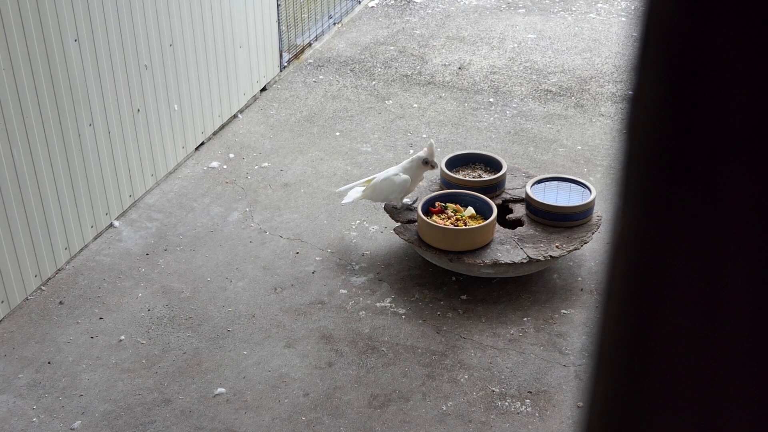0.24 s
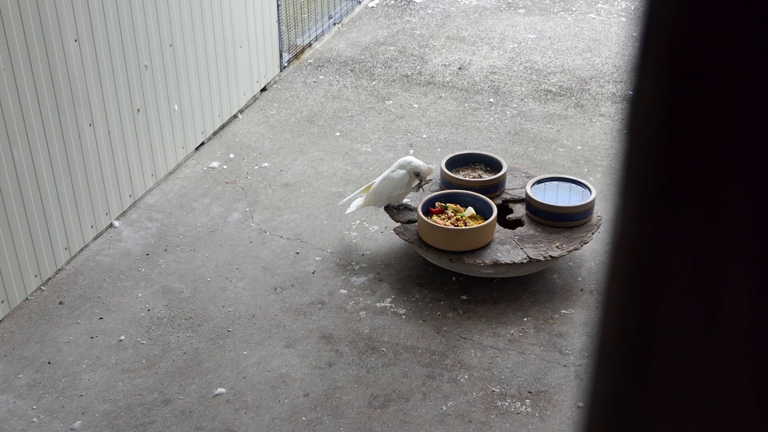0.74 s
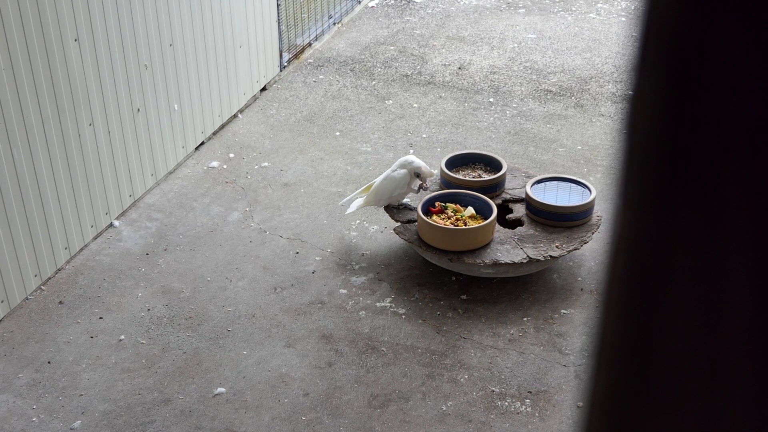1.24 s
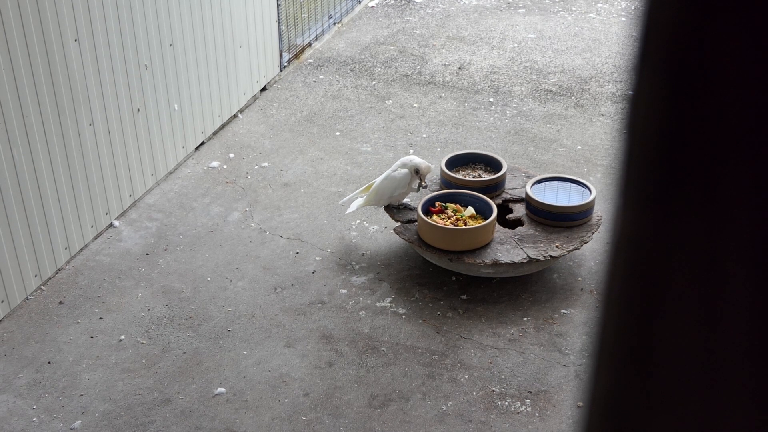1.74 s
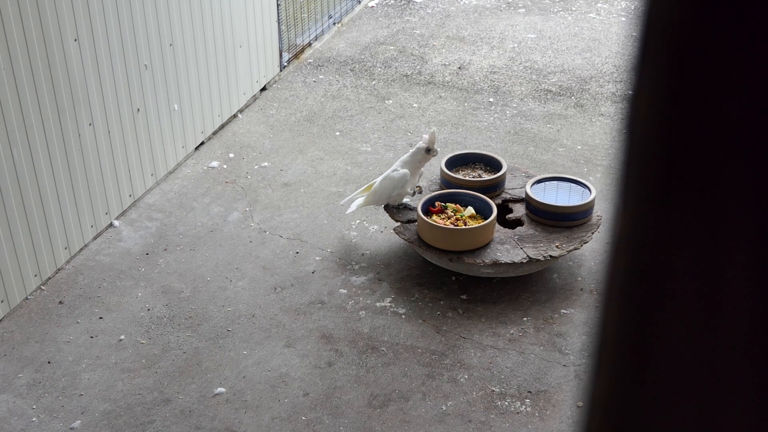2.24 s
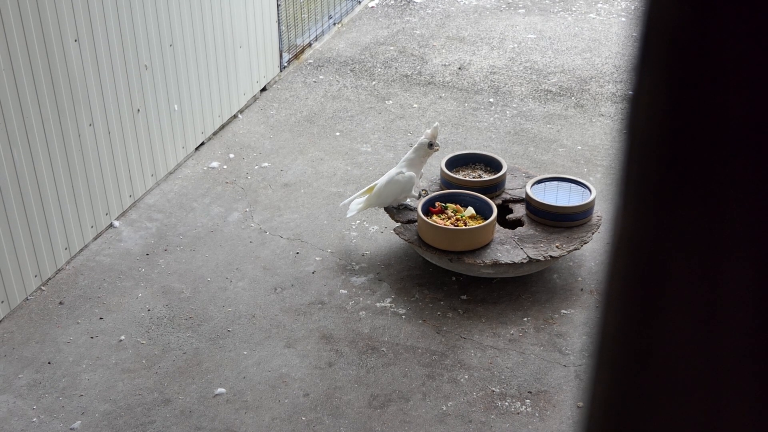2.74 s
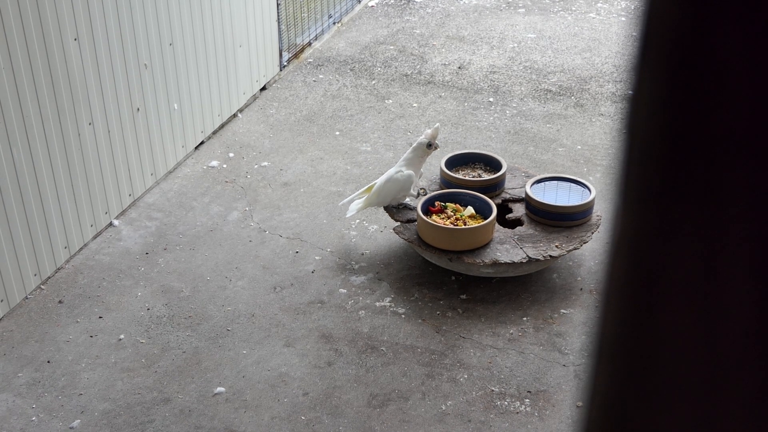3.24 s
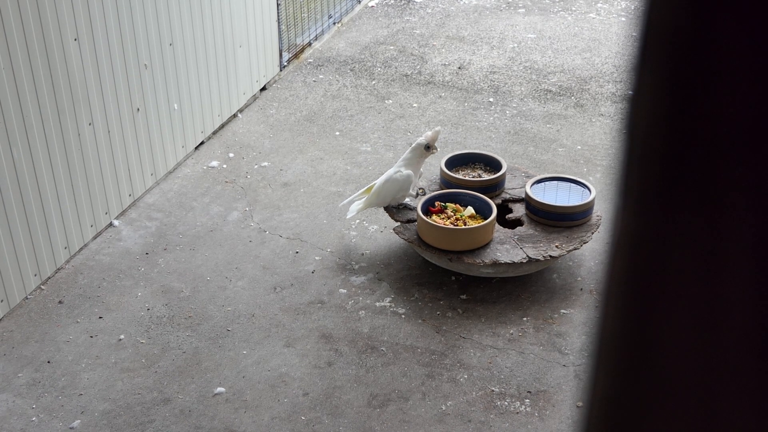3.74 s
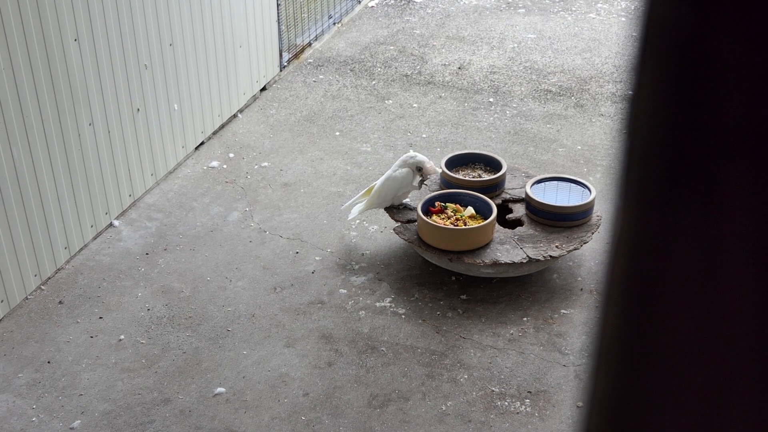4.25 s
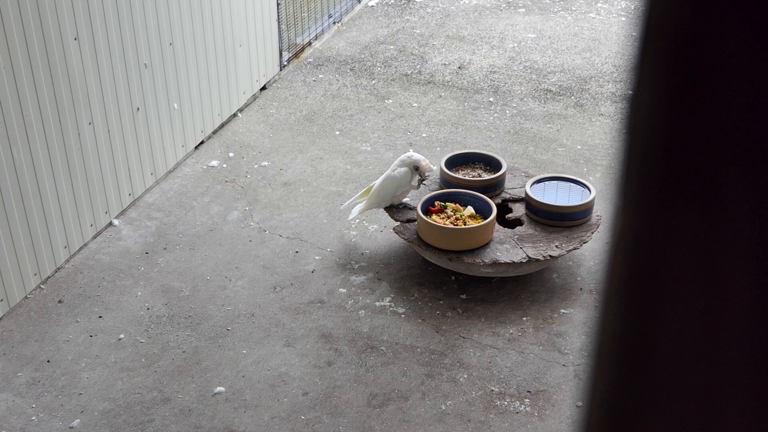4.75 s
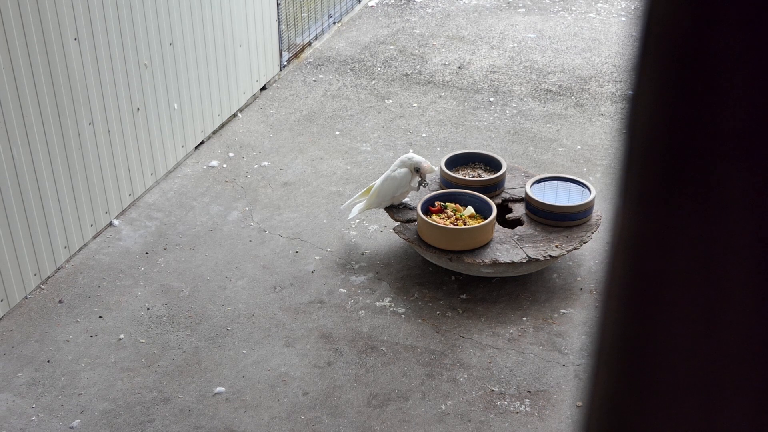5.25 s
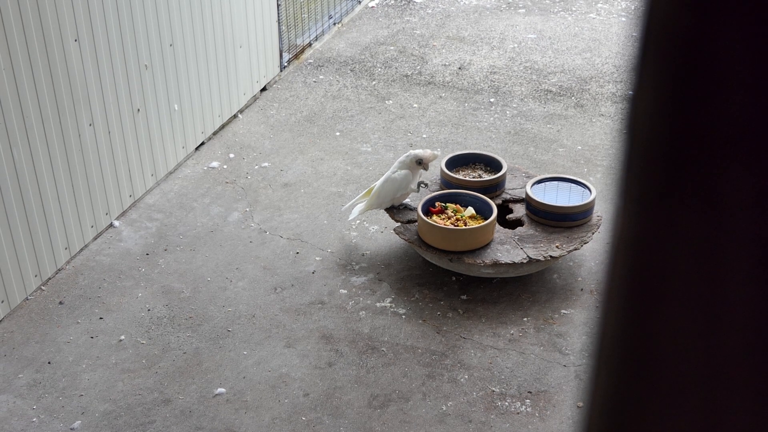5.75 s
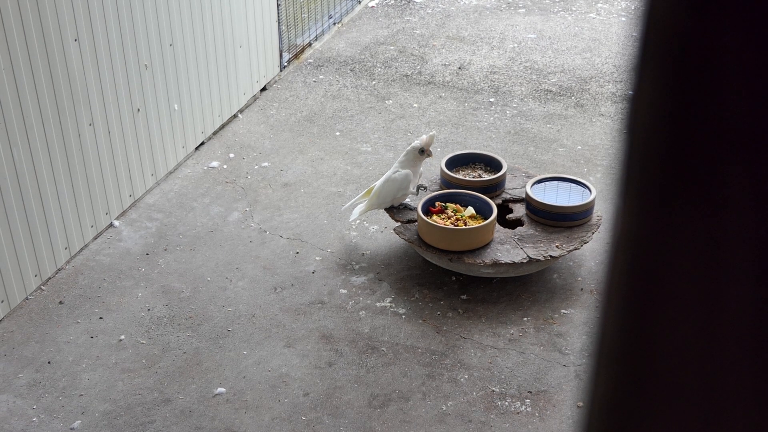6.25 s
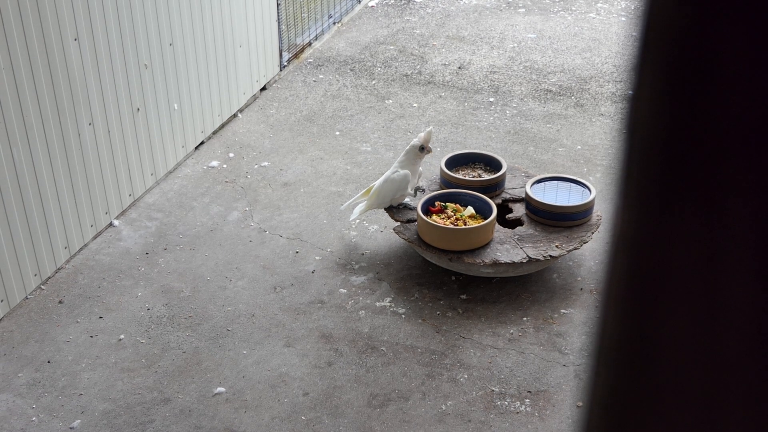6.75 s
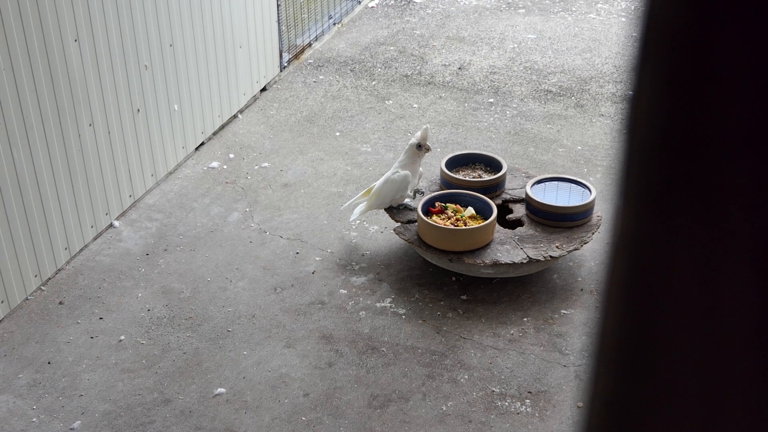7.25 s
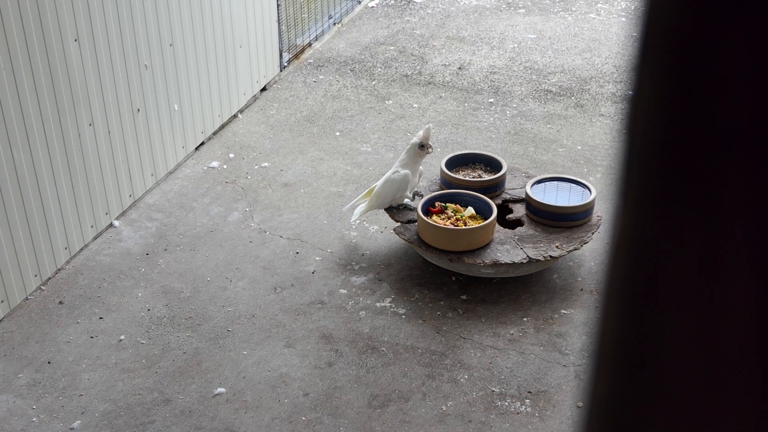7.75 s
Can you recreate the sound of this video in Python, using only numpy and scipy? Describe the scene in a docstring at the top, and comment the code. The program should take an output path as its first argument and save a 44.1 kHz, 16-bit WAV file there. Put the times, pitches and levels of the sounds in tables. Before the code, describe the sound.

A cockatoo screeches loudly and harshly up close, another answers farther off, and small birds chirp softly in an outdoor aviary.

```python
"""Parrots in an aviary

Two large parrots screech in turn, one near the microphone, one farther off, their vocal membranes
rasping in and out of order. Small birds chirp and trill between; beaks and feet tick and clank on wire
and tin. Concrete and sheet-metal walls answer each sound, over a low rumble and a thin outdoor hiss.
The loudest cries clip the microphone's input."""
import sys
import numpy as np
from scipy import signal
from scipy.fft import rfft, irfft, next_fast_len
from scipy.io import wavfile
from scipy.ndimage import map_coordinates

SR = 44100
rng = np.random.default_rng(int(sys.argv[2]) if len(sys.argv) > 2 else 0)


def wrap_up_sound(samples):
    """Save the sound to the file named by the first command line argument, as 16-bit audio."""
    columns = np.atleast_2d(samples).T
    # keep every value between -1 and 1, then stretch to whole-number steps
    tamed = np.clip(columns, -1, 1)
    steps = np.round(tamed * 32767).astype(np.int16)
    wavfile.write(sys.argv[1], SR, steps)


N = 352359

# The microphone's close-set ports. Each row: frequency in Hz, left-right likeness from 0 to 1.
PORT_LIKENESS = [(60, .7), (130, 0.9), (300, 0.94), (640, 0.81), (1400, 0.61), (3100, 0.47), (6800, 1),
                 (15000, 0.33)]
# Its stereo widening. Each row: frequency in Hz, lift of side over mid in dB.
SIDE_LIFT = [(40, 3.5), (200, 7), (500, 8), (1200, 0), (2500, -2.5)]
# The hard walls. Each row: frequency in Hz, seconds to die by 60 dB (t60).
WALL_DECAY = [(300, 0.6), (1300, 0.47), (3500, 0.49), (9000, 0.38), (15000, .3)]

# Background rumble and hiss as heard; the rumble ducks just after the loudest cry.
# Each row: time in seconds, rumble in dB, hiss in dB.
BACKGROUND_LEVELS = [(0, -58.5, -64), (.6, -61, -70), (1.2, -59.5, -57), (1.7, -61, -61.5),
                     (3.5, -56.5, -62.5), (3.65, -67.5, -57), (3.9, -63, -57.5), (4.8, -62, -62.5),
                     (5.65, -64, -61), (5.8, -57, -60), (6, -62, -61.5), (6.3, -55, -53.5),
                     (6.9, -57.5, -59), (7.499, -54.5, -54.5)]
# The colour of each. Each row: frequency in Hz, relative density in dB.
RUMBLE_SPECTRUM = [(15, -43), (30, -24), (75, -9), (123, -15), (198, -2.5), (300, -6), (400, -10),
                   (540, -12), (650, -35.5), (900, -47)]
HISS_SPECTRUM = [(300, -24.5), (600, 0.5), (1200, 1), (1900, -1), (2400, -3), (4000, -3.5), (5300, -16.5),
                 (7000, -21.5), (10000, -5.5), (12000, -16.5), (15500, -36.5)]
# Narrow bands in the hiss. Each row: centre in Hz, width in Hz, relative density in dB.
HISS_BANDS = [(542, 31, 11), (1960, 340, -1), (5460, 470, -2)]
# A low hum. Each row: time in seconds, level in dB.
HUM_LEVELS = [(0, -77.5), (.8, -83), (1.1, -65), (1.6, -64.5), (1.8, -88), (7.99, -95)]

# Sharp ticks, slower scuffs, a thud. Each row: start in seconds, level in dB, centre in Hz,
# t60 in seconds.
TICKS = [(.436, -45, 6750, .091), (.975, -46, 7200, .11), (1.19, -46.5, 10150, .024),
         (6.025, -46.5, 10250, .092), (6.735, -46, 7900, .033), (7.214, -45, 9880, .1),
         (7.485, -52.5, 7010, .04), (7.63, -49, 7950, .045)]
SCUFFS = [(6.11, -41.5, 11310, 0.16), (6.37, -49, 8180, .2), (7.04, -47.5, 10000, .26)]
THUDS = [(.207, -47.5, 234, 0.19)]
# Their shapes. Each: width in octaves, rise in seconds.
TICK_SHAPE, SCUFF_SHAPE, THUD_SHAPE = (1.3, .0023), (.6, .021), (.56, .0055)
# Blows that leave a wire singing. Each row: start in seconds, level in dB.
WIRE_BLOWS = [(1.284, -49), (6.023, -40.5)]
# The wire's strike, then its ring. Each row: delay in seconds, relative level in dB, centre in Hz,
# t60 in seconds, width in octaves, rise in seconds.
WIRE_PARTS = [(0, 1, 9870, .12, 0.2, 0.0016), (.015, -6, 9900, 0.9, .08, 0.011)]
# Blows on a tin sheet. Each row: start in seconds, ring in dB, rattle in dB.
TIN_BLOWS = [(0.438, -67, -51), (.976, -63.5, -51.5), (7.291, -65, -52.5)]
# The sheet's modes. Each row: frequency in Hz, relative level in dB, t60 in seconds.
TIN_MODES = [(292.3, -5, 0.97), (517, 7.5, 1), (798, 4.5, 0.31), (898, -2, 0.51), (1180, -7, 0.98),
             (2080, -1, .2), (2400, 4, .2), (3200, 6, 0.16)]
# Its rattle. Each row: frequency in Hz, relative density in dB.
RATTLE_SPECTRUM = [(150, -44), (250, -7), (518, -11.5), (1260, -16.5), (2340, -14), (4190, -22),
                   (7260, -28.5), (12000, -27), (15600, -54), (22000, -120)]

# Clean peeps and fluttering down-slurs. Each row: start in seconds, relative level in dB,
# length in seconds, first and last pitch in Hz.
PEEPS = [(0.206, -39, .026, 5490, 4883), (1.38, -73.5, .054, 4170, 4020), (1.5, -64.5, 0.058, 4200, 3913),
         (1.661, -55.5, 0.069, 3796, 4180), (4.364, -37, .02, 2500, 2750), (5.869, -48, .035, 2960, 3450),
         (5.901, -47.5, 0.047, 4163, 3800), (6.317, -53, .07, 4084, 3855), (6.74, -43.5, 0.028, 6490, 5930),
         (7.223, -37.5, .06, 5960, 5830), (7.633, -44.5, .048, 6260, 5630)]
SLURS = [(0.251, -44, 0.071, 4746, 2778), (.49, -49, 0.076, 4585, 2800), (5.969, -53.5, 0.03, 3560, 2875),
         (6.835, -46.5, .085, 4330, 3150), (7.09, -49.5, 0.1, 3595, 3370), (7.49, -43.5, 0.063, 4520, 3120)]
# Nasal cheeps. Each row: as for the peeps, then the fundamental in dB against the second partial.
CHEEPS = [(.002, -47.5, .075, 2900, 2870, -4.5), (1.769, -37, .045, 2850, 2717, 0),
          (4.144, -38.5, 0.042, 2606, 3070, -11), (4.251, -32.5, 0.057, 2530, 3066, -18.5),
          (4.37, -31, .055, 3000, 2318, -18), (5.188, -30, 0.015, 3165, 2283, -11)]
# Rising chips. Each row: start in seconds, relative level in dB, top pitch in Hz, fundamental in dB.
CHIPS = [(4.486, -37.5, 3017, -5.5), (4.51, -34, 3848, 1), (4.598, -35.5, 3305, -7), (4.62, -29.5, 3900, 1),
         (4.722, -30.5, 3523, -6.5), (4.844, -31, 3400, -6.5), (4.962, -30.5, 3030, -11.5),
         (5.085, -29, 3306, -7)]
# A trill of dipping notes. Each row: start in seconds, relative level in dB, pitch in Hz.
TRILL = [(5.277, -28.5, 5040), (5.399, -29, 5056), (5.508, -28.5, 5227), (5.614, -29.5, 5206),
         (5.73, -30, 5442)]
CHIP_S, CHIP_START_HZ, TRILL_S = .011, 2630, .039
PEEP_FUNDAMENTAL_DB, SLUR_FUNDAMENTAL_DB, TRILL_FUNDAMENTAL_DB = 13.5, 12.5, 5.5
# Small voices. Each: mid-glide bow as a share of pitch, step per overtone in dB, flutter from 0 to 1.
PEEP_VOICE, SLUR_VOICE, CHEEP_VOICE = (.0086, -19, .3), (.046, -13, 1), (.015, -13, .38)
CHIP_VOICE, TRILL_VOICE = (.01, -6, .11), (-.14, -16, .69)
# Breath in a chirp. Each row: frequency in Hz, relative density in dB.
CHIRP_BREATH = [(1500, -48), (2500, -7), (11000, 2.5), (15000, -13.5)]

# Parrot throats: the far bird, the near bird hoarse and clear. Each row: frequency in Hz, gain in dB.
FAR_THROAT = [(240, -78.5), (400, -68), (847, -27), (1380, -7.5), (1880, -4), (2030, -4), (2360, -1),
              (3210, -13.5), (3920, -3), (4560, -8.5), (5320, -9), (5920, -20.5), (8040, -32), (9230, -19),
              (15500, -44.5)]
HOARSE_THROAT = [(300, -41.5), (600, -27.5), (987, -11), (1200, -15), (1400, -10), (1910, -14.5),
                 (2250, -7), (2480, -4.5), (2720, -10), (3050, -8.5), (3650, -6.5), (4230, -12),
                 (4700, -10), (5570, -14), (6900, -19.5), (9820, -24.5), (15500, -47)]
CLEAR_THROAT = [(320, -60.5), (600, -18.5), (900, -16.5), (1230, -1), (1800, -11), (2400, 3), (3000, -16),
                (3550, -4), (4200, -16.5), (4800, -6), (5900, -10), (7500, -21), (10000, -21),
                (15500, -48.5)]
# The far cries. Each row: start, attack and length before release in seconds, relative level in dB.
FAR_CRIES = [(1.87, 0.082, 0.4, -9), (3.498, .06, 0.26, -13.5)]
# The three near cries, a list apiece. Each row: time in seconds, relative level in dB, pitch in Hz,
# chaos from 0 to 1, lift under 1.5 kHz in dB.
NEAR_CRIES = [
    [(2.29, -19.5, 600, .95, 3.5), (2.37, -6.5, 599.5, 0.74, -0.5), (2.518, -7, 627, .68, -1),
     (2.575, -13.5, 638, 0.46, 4.5), (2.635, -12, 622.6, 0.09, 9.5), (2.68, -15, 594.4, .2, -2.5),
     (2.718, -11, 599.4, 0.1, 0.5), (2.755, -13.5, 585.7, .08, 3.5), (2.8, -25.5, 520, 0.47, 14.5),
     (2.82, -29, 512, .4, 8)],
    [(2.99, -35, 613.3, 0.52, 4), (3.005, -20, 618.2, 0.58, 2), (3.057, -6.5, 622.3, 0.58, -3),
     (3.2, -4.5, 620.7, .66, -7.5), (3.345, -2, 621.8, 0.63, -7), (3.384, -5, 628.5, 0.26, -3),
     (3.481, -8, 611.4, .35, 1.5), (3.53, -9, 596, 0.38, -1), (3.563, -13, 567.5, .2, 3),
     (3.598, -25, 578, 0.4, 1.5)],
    [(7.734, -40.5, 601, 0.42, 7.5), (7.77, -19, 605.2, 0.53, 4), (7.82, -8, 619.8, 0.63, 3),
     (7.861, -5.5, 617.4, 0.67, 0.5), (7.99, -6, 614.5, 0.66, 0)],
]
# The beak's resonance. Each entry: its lift in one near cry, in dB.
BEAK_LIFTS = [0, 6.5, -6]
BEAK_HZ, BEAK_WIDTH_HZ = 2500, 700
ODD_CLEAR_DB, ODD_HOARSE_DB = 2, -11.5  # odd partials against the even ones


def amp(db):
    """Gain of a level in dB."""
    return 10 ** (np.asarray(db) / 20)


def unit(x):
    """x at rms 1."""
    return x / np.sqrt(np.mean(x ** 2) + 1e-20)


def along(points, hz):
    """Reads (Hz, value) points on a log axis."""
    freqs, values = np.transpose(points)
    return np.interp(np.log(hz + 1), np.log(freqs + 1), values)


def wobble(n, rate):
    """A smooth random curve of n samples, rate knots a second."""
    return map_coordinates(rng.standard_normal(int(n * rate / SR) + 4), [np.arange(n) * rate / SR])


def filtered(x, response):
    """x through a gain that depends on frequency."""
    size = next_fast_len(x.shape[-1] + 4096)
    return irfft(rfft(x, size) * response(np.fft.rfftfreq(size, 1 / SR)), size)[..., :x.shape[-1]]


def coloured(x, spectrum):
    """x through a curve of (Hz, dB) points, at rms 1."""
    return unit(filtered(x, lambda hz: amp(along(spectrum, hz))))


def spread(pair):
    """Two unrelated signals mixed to the likeness of the two microphone ports."""
    turn = lambda hz: np.arccos(np.clip(along(PORT_LIKENESS, hz), -1, 1)) / 2
    mid, side = filtered(pair, lambda hz: np.array([np.cos(turn(hz)), np.sin(turn(hz))]))
    return np.array([mid + side, mid - side])


def place(out, start, x, tail, wet_db, pan_db):
    """Sets a sound and the walls' answer before the microphone; positive pan is to the left."""
    heard = signal.fftconvolve(x[None], tail, axes=1) * amp(wet_db)
    heard[:, :len(x)] += x
    first = round(start * SR)
    out[:, first:first + heard.shape[1]] += (heard * amp([[pan_db / 2], [-pan_db / 2]]))[:, :N - first]


def wall_answers(count):
    """Stereo tails off the hard walls: each builds quickly, then dies band by band."""
    hz, t, bands = signal.stft(rng.standard_normal((count, 2, SR // 2)), SR, nperseg=256)
    decay = amp(-60 * (t / along(WALL_DECAY, hz)[:, None]) ** .98)
    rise = 1 - np.exp(-t / .0015)
    tails = [spread(pair) for pair in signal.istft(bands * decay * rise, SR, nperseg=256)[1]]
    return [tail / np.linalg.norm(tail[0]) for tail in tails]


def background(hum_hz=75):
    """As heard at the microphone: a low rumble, a thin hiss with narrow bands, a hum that fades early."""
    t = np.arange(N) / SR
    times, rumble_db, hiss_db = np.transpose(BACKGROUND_LEVELS)
    level = lambda when, db: amp(np.interp(t, when, db))
    noise = lambda gain: unit(spread(filtered(rng.standard_normal((2, N)), gain)))
    bands = lambda hz: sum(amp(db) / (1 + (2 * (hz - centre) / width) ** 2)
                           for centre, width, db in HISS_BANDS)
    rumble_gain = level(times, rumble_db) * amp(1.2 * wobble(N, 9))
    hiss_gain = level(times, hiss_db) * amp(1.2 * wobble(N, 6))
    rumble = noise(lambda hz: amp(along(RUMBLE_SPECTRUM, hz)))
    hiss = noise(lambda hz: amp(along(HISS_SPECTRUM, hz)) + bands(hz))
    hum = level(*np.transpose(HUM_LEVELS)) * np.sin(2 * np.pi * hum_hz * t + .8 * wobble(N, 11))
    return rumble_gain * rumble + hiss_gain * hiss + hum


def beaks_and_feet(tails):
    """Contacts on wire and concrete, off the microphone: each a dying band of noise."""
    out, t = np.zeros((2, N)), np.arange(SR // 2) / SR
    kinds = (TICKS, TICK_SHAPE), (SCUFFS, SCUFF_SHAPE), (THUDS, THUD_SHAPE)
    hits = [row + shape for table, shape in kinds for row in table]
    hits += [(start + delay, db + part_db, *rest)
             for start, db in WIRE_BLOWS for delay, part_db, *rest in WIRE_PARTS]
    for k, (start, db, centre_hz, t60, octaves, rise) in enumerate(sorted(hits)):
        band = lambda hz: np.exp(-.5 * (np.log2((hz + 1) / centre_hz) / octaves) ** 2)
        colour = lambda hz: (band(hz) + amp(-18.5) * (hz > 1500)) / (1 + (hz / 12500) ** 6)
        envelope = amp(db - 60 * t / t60) * (1 - np.exp(-t / rise))
        burst = envelope * unit(filtered(rng.standard_normal(len(t)), colour))
        place(out, start, burst, tails[k % len(tails)], wet_db=6.5, pan_db=.5)
    return out


def tin_sheet(tails, rattle_t60=.5):
    """A little to the right, a struck sheet rings in its modes and rattles."""
    out, t = np.zeros((2, N)), np.arange(SR // 2) / SR
    for (start, ring_db, rattle_db), tail in zip(TIN_BLOWS, tails):
        ring = sum(amp(db + rng.normal(0, 1) - 60 * t / t60) * np.sin(2 * np.pi * hz * t)
                   for hz, db, t60 in TIN_MODES)
        rattle = coloured(rng.standard_normal(len(t)), RATTLE_SPECTRUM)
        rattle *= amp(rattle_db + .96 * wobble(len(t), 41) - 60 * t / rattle_t60)
        place(out, start, amp(ring_db) * ring + rattle, tail, wet_db=9, pan_db=-3)
    return out


def chirp(length, first_hz, last_hz, fundamental_db, bow, step_db, flutter, flutter_hz=190):
    """A quick raspy glide with overtones, fluttering in pitch and strength."""
    t = np.linspace(0, length, int(length * SR))
    middle_hz = (first_hz + last_hz) / 2 * (1 + bow)
    glide = np.interp(t, [0, length / 2, length], [first_hz, middle_hz, last_hz])
    shake = flutter * np.sin(2 * np.pi * flutter_hz * t)
    phase = 2 * np.pi * np.cumsum(glide * (1 + .053 * shake)) / SR + 1.4 * flutter * wobble(len(t), 900)
    overtones = sum(amp(step_db * k) * np.sin((k + 2) * phase) for k in range(4))
    tone = unit(amp(fundamental_db) * np.sin(phase) + overtones)
    # the weaker the fundamental, the more breath
    breath = amp(-15 - .33 * fundamental_db) * coloured(rng.standard_normal(len(t)), CHIRP_BREATH)
    fade = np.clip(np.minimum(t, length - t) / .0011, 0, 1)
    return fade * (1 + shake) * (tone + breath)


def small_birds(tails):
    """Five kinds of note from across the aviary, with more wall than direct sound."""
    out = np.zeros((2, N))
    notes = [(*row, PEEP_FUNDAMENTAL_DB, *PEEP_VOICE) for row in PEEPS]
    notes += [(*row, SLUR_FUNDAMENTAL_DB, *SLUR_VOICE) for row in SLURS]
    notes += [(*row, *CHEEP_VOICE) for row in CHEEPS]
    notes += [(start, db, CHIP_S, CHIP_START_HZ, *rest, *CHIP_VOICE) for start, db, *rest in CHIPS]
    notes += [(start, db, TRILL_S, hz, hz, TRILL_FUNDAMENTAL_DB, *TRILL_VOICE) for start, db, hz in TRILL]
    for k, (start, db, *note) in enumerate(sorted(notes)):
        place(out, start, amp(db - 8.5) * chirp(*note), tails[k % len(tails)], wet_db=4.5, pan_db=1)
    return out


def screech(contour, clear, hoarse, jitter, breath):
    """A membrane whose cycles lose their order as chaos rises, heard through the throat."""
    times, *columns = np.transpose(contour)
    t = np.arange(times[0], times[-1], 1 / SR)
    n = len(t)
    db, pitch, chaos, odd_db = [np.interp(t, times, column) for column in columns]
    pitch *= 1 + .05 * chaos ** 2 * wobble(n, 70)  # a hoarse voice cannot hold its pitch
    # timing errors smear the upper partials most
    phase = 2 * np.pi * np.cumsum(pitch) / SR + jitter * chaos ** 2 * wobble(n, 320)
    # each partial swells and breaks on its own
    partial = lambda k: amp(4.5 * wobble(n, 18.07)) * np.cos(k * phase + rng.uniform(0, 2 * np.pi))
    stack = sum(map(partial, range(2, 26, 2))) + amp(odd_db) * sum(map(partial, range(1, 26, 2)))
    tone = (1 - chaos) * coloured(stack, clear) + chaos * coloured(stack, hoarse)
    rasp = coloured(rng.standard_normal(n) * (1 + .53 * np.cos(2 * phase)), hoarse)
    rasp_share = np.clip(breath * chaos ** 2, 0, 1)
    voice = np.sqrt(1 - rasp_share) * tone + np.sqrt(rasp_share) * rasp
    throb = amp(2 * chaos * wobble(n, 240))
    fade = np.clip(np.minimum(t - times[0], times[-1] - t) / .012, 0, 1)
    return voice * throb * amp(db) * fade


def far_parrot(tails, pitch_hz=586.8, chaos=.88, odd_db=-1.5, sag_db_per_s=8, release_s=.08):
    """Farther off, hoarse throughout: an attack, a sagging hold and a release around one pitch."""
    out = np.zeros((2, N))
    for (start, attack, length, db), tail in zip(FAR_CRIES, tails):
        end_db = db - sag_db_per_s * (length - attack)
        envelope = [(0, db - 23.5), (attack, db), (length, end_db), (length + release_s, end_db - 31)]
        contour = [(start + later, level, pitch_hz, chaos, odd_db) for later, level in envelope]
        cry = screech(contour, FAR_THROAT, FAR_THROAT, jitter=.8, breath=.75)
        place(out, start, amp(-6) * cry, tail, wet_db=1.5, pan_db=.5)
    return out


def near_parrot(tails):
    """Close to the microphone: cries shaped by chest and beak, the odd partials rising as they clear."""
    out = np.zeros((2, N))
    beak = lambda hz: np.exp(-.5 * ((hz - BEAK_HZ) / BEAK_WIDTH_HZ) ** 2) - .5
    for rows, beak_db, tail in zip(NEAR_CRIES, BEAK_LIFTS, tails):
        contour = [(when, db, hz, chaos, ODD_CLEAR_DB + (ODD_HOARSE_DB - ODD_CLEAR_DB) * chaos)
                   for when, db, hz, chaos, _ in rows]
        cry = screech(contour, CLEAR_THROAT, HOARSE_THROAT, jitter=.7, breath=1.1)
        times, *_, chest_db = np.transpose(rows)
        chest = amp(np.interp(times[0] + np.arange(len(cry)) / SR, times, chest_db))
        cry += (chest - 1) * filtered(cry, lambda hz: 1 / (1 + (hz / 1500) ** 8))
        cry = filtered(cry, lambda hz: amp(beak_db * beak(hz)))
        place(out, times[0], amp(-3.5) * cry, tail, wet_db=-1.5, pan_db=1.2)
    return out


def scene():
    """The aviary from where the microphone stands."""
    tails = wall_answers(count=7)
    birds = near_parrot(tails[:3]) + far_parrot(tails[3:]) + small_birds(tails)
    return birds + beaks_and_feet(tails) + tin_sheet(tails) + background()


def record(dry, ceiling=.67, low_cut_hz=60, top_hz=15700):
    """The microphone's input clips; deep bass is cut, the lows widened and the top band turned down."""
    left, right = dry / (1 + np.abs(dry / ceiling) ** 12) ** (1 / 12)
    low_cut = lambda hz: hz ** 2 / (hz ** 2 + low_cut_hz ** 2)
    widen = lambda hz: amp(np.outer([-.5, .5], along(SIDE_LIFT, hz)))
    mid, side = filtered(np.array([left + right, left - right]) / 2, lambda hz: low_cut(hz) * widen(hz))
    wide = np.clip(amp(.42) * np.array([mid + side, mid - side]), -1, 1)
    return filtered(wide, lambda hz: np.where(hz < top_hz, 1, .07))


dry = scene()
out = record(dry)
wrap_up_sound(out)
```